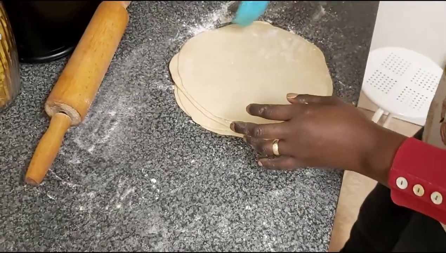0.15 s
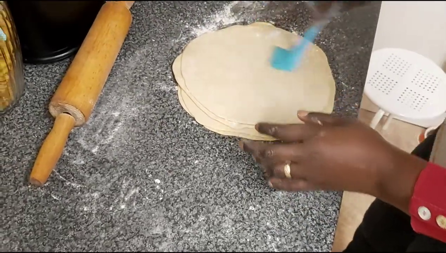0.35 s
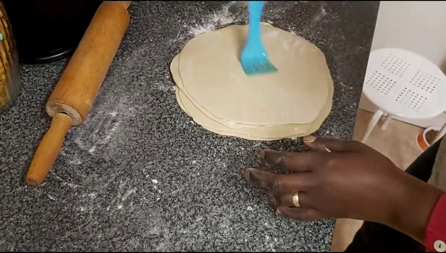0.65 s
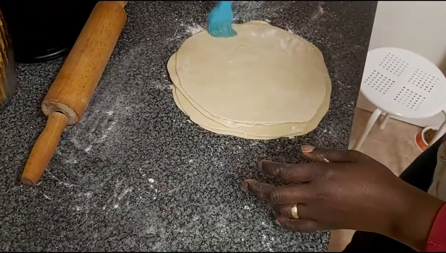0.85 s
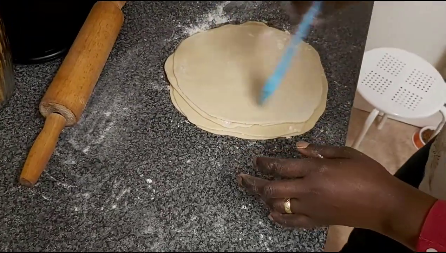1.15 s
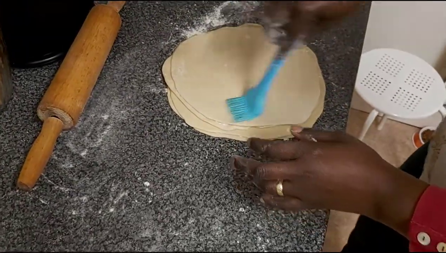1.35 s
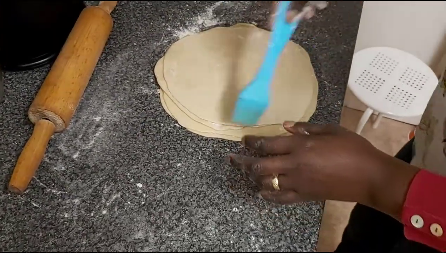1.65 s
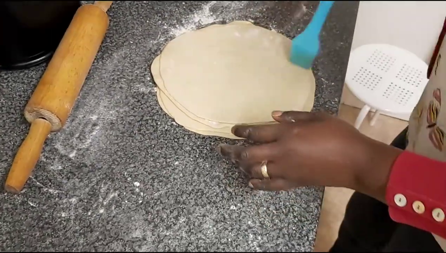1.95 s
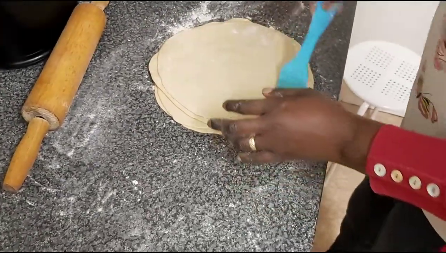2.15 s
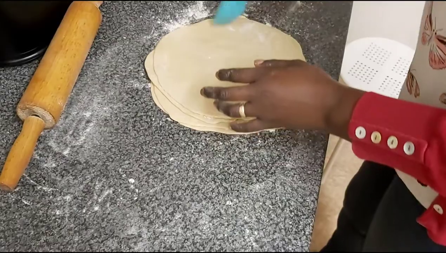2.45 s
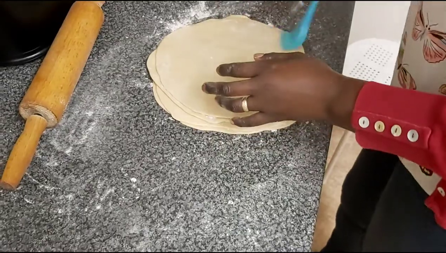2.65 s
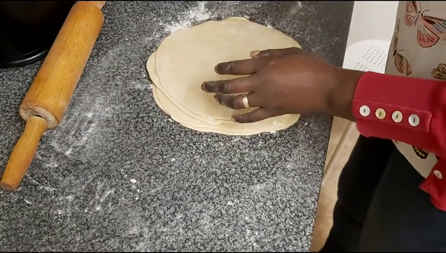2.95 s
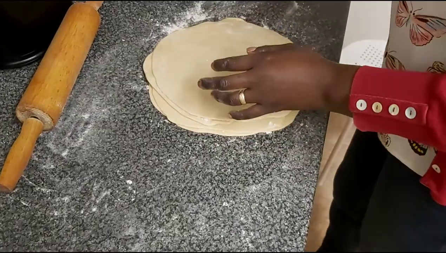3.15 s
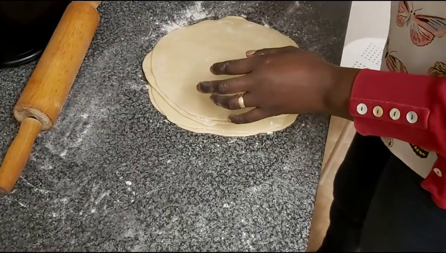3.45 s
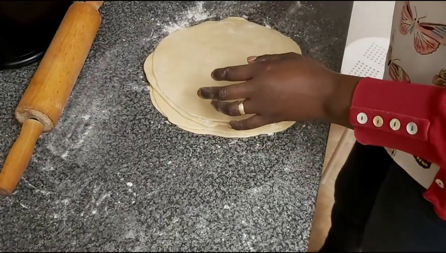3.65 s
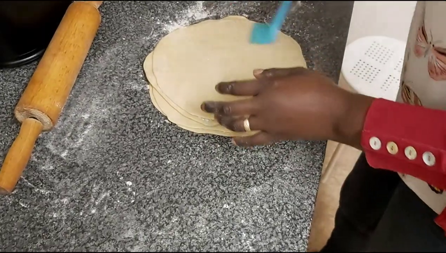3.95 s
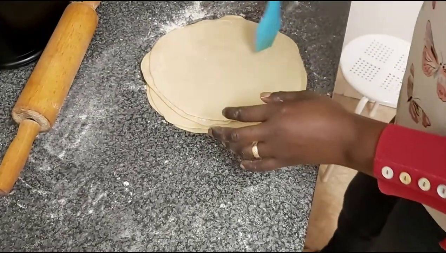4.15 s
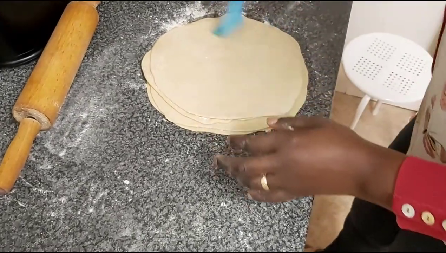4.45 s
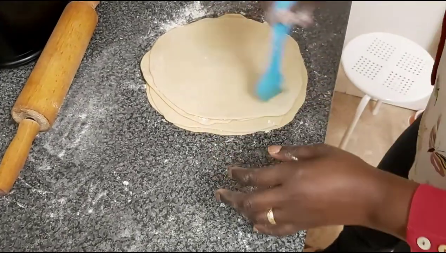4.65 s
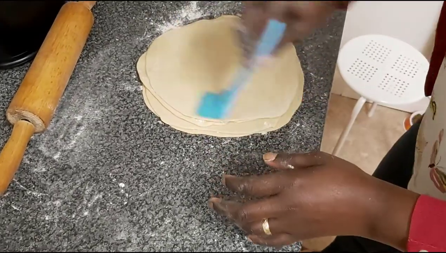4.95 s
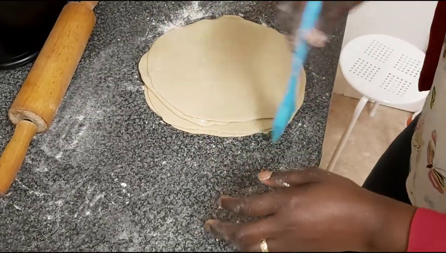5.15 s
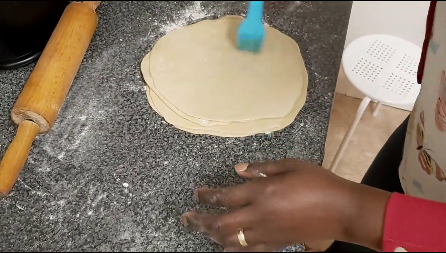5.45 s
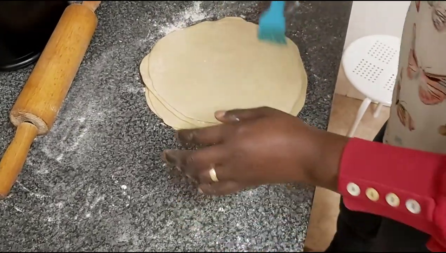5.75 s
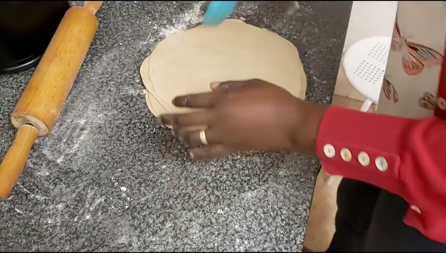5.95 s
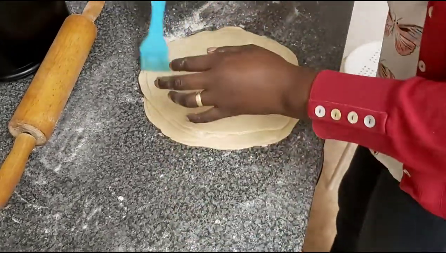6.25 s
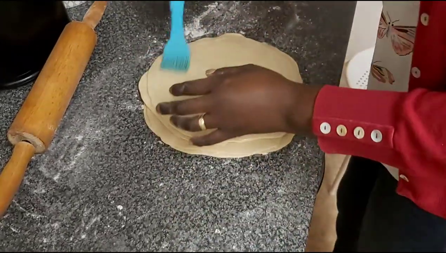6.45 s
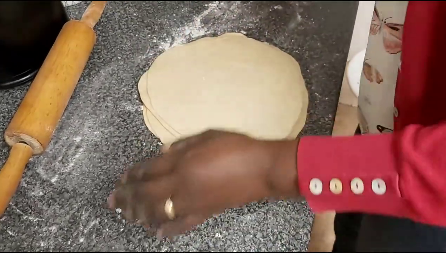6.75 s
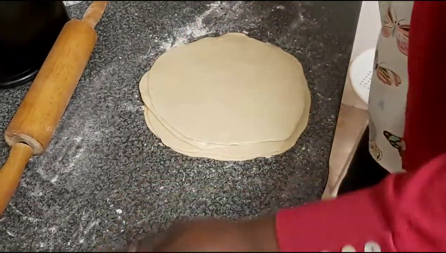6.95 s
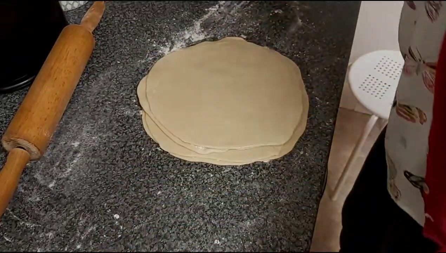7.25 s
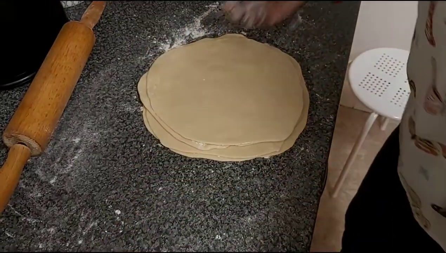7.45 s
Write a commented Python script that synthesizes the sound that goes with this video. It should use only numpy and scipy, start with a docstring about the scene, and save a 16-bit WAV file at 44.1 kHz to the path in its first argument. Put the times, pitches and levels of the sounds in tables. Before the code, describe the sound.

In a small kitchen, a low wavering motor hum runs throughout. Close by, a soft oily brush swishes across dough in quick separate strokes, with small wet ticks. The strokes pause, a tiny squeak and faint sleeve rustle pass, then a pot scuffs and knocks hard on the stone counter. Lighter brushing resumes, and finally a dish lands with a loud clunk, settles and rings briefly.

```python
"""Brushing oil on dough

A soft pastry brush swishes over dough in quick strokes: shaped noise for bristles, oil film and drag.
Midway the brush is dipped and the oil pot scuffs and knocks on the stone counter; near the end a dish
is set down and rings briefly. Both vessels are sums of decaying modes, a noise crack and a room tail.
Wet ticks, a tiny double squeak and cloth rustles join in. Behind them an appliance motor hums: wavering
sine lines over casing rumble and moving air."""
import sys
import numpy as np
from scipy import signal
from scipy.fft import rfft, irfft, next_fast_len
from scipy.io import wavfile

SR = 44100
rng = np.random.default_rng(int(sys.argv[2]) if len(sys.argv) > 2 else 0)


def pcm_store(signal):
    """Save signal as 16-bit PCM."""
    levels = np.round(np.clip(np.atleast_2d(signal), -1, 1) * 32767)
    wavfile.write(sys.argv[1], SR, levels.astype(np.int16).T)


N = 335149

# brush strokes: (touch-down [s], rise [s], fall [s], swish level [dB], wet fizz [dB re swish],
#   dough drag [dB re swish], power share on bristle tips [0-1], touch-down depth under peak [dB], fizz lag [s])
BRUSH_STROKES = [(0.342, 0.098, 0.13, -42.5, -7, -1.5, 0.24, 29, 0.017),
                 (0.685, 0.115, 0.11, -49.5, -6.5, -0.5, 0.46, 12.5, -0.0056),
                 (1.002, 0.051, 0.081, -45.5, -3.7, -5, 0.17, 18, 0.0022),
                 (1.064, 0.061, 0.12, -49.5, -4, -2.5, 0.3, 15, -0.003),
                 (1.447, 0.089, 0.12, -47.2, -4.5, -5.5, 0.62, 21, 0.004),
                 (1.83, 0.11, 0.13, -48.9, -4.3, -3, 0.4, 16.5, 0.0051),
                 (2.218, 0.11, 0.13, -45.5, -3, -5.5, 0.5, 17.0, 0.013),
                 (2.607, 0.069, 0.18, -48.5, -3.5, 1.8, 0.5, 17.0, 0.004),
                 (4.012, 0.096, 0.11, -59.0, -4, 1.5, 0.56, 9, 0.005),
                 (4.314, 0.026, 0.15, -58.5, -2.1, 2.5, 0.2, 18.0, -0.002),
                 (4.553, 0.075, 0.14, -48, -5, -12, 0.52, 10.5, 0.01),
                 (4.969, 0.05, 0.16, -58, -4, -4, 0.4, 11, 0.0016),
                 (5.035, 0.099, 0.1, -48.5, -9, -6.5, 0.78, 13, 0.012),
                 (5.351, 0.099, 0.11, -52.5, -3.0, -4.5, 0.3, 16, 0.01),
                 (5.709, 0.12, 0.15, -50, -3.5, -3.3, 0.45, 19, 0.0033),
                 (6.277, 0.053, 0.117, -62.5, -2.4, -9.8, 0.4, 16.0, -0.00059),
                 (6.523, 0.056, 0.11, -53.5, -1, -8, 0.44, 19, -0.00085)]
# bristle sides, relative spectrum: (frequency [Hz], density [dB per Hz])
SWISH_SPECTRUM = [(1500, -25), (3100, -9.5), (3700, -3), (4250, 0), (4700, -5), (6500, -9.5), (9500, -28),
                  (15000, -40)]
# bristle tips, relative spectrum: (frequency [Hz], density [dB per Hz])
TIP_SPECTRUM = [(2000, -40), (3800, -19), (4700, -2), (5350, 0), (5900, -3), (6600, -7), (7700, -5.5),
                (9500, -26), (15000, -40)]
# tearing oil film, relative spectrum: (frequency [Hz], density [dB per Hz])
FIZZ_SPECTRUM = [(4000, -40), (6500, -10), (8000, -1.5), (9300, -.5), (11100, 0), (12800, -3),
                 (14000, -5.5), (16000, -7.5)]
# drag on the dough, relative spectrum: (frequency [Hz], density [dB per Hz])
DRAG_SPECTRUM = [(300, -11), (700, -4), (1100, 2.5), (1500, 2), (2200, 1.5), (3000, -4.5), (4000, -14),
                 (7000, -40)]
# oily bristles touching down or letting go: (time [s], level [dB], centre frequency [Hz])
BRISTLE_TAPS = [(.636, -48, 8900), (1.016, -43, 3830), (1.047, -43, 7000), (1.236, -54, 7000),
                (2.233, -52, 5500), (4.337, -63, 9000), (5.436, -43.5, 7500), (5.548, -55, 5000)]

# two pushes of the pot along the counter: (start [s], rise [s], fall [s], level [dB])
POT_SCUFFS = [(3.486, 0.042, 0.13, -40), (3.545, 0.033, 0.093, -36.5)]
# pot on stone, relative scuff spectrum: (frequency [Hz], density [dB per Hz])
SCUFF_SPECTRUM = [(25, -10), (90, 3), (300, 2), (550, 9), (850, 14), (1500, 3), (3000, 2.5), (6000, 0.5),
                  (12000, -4.5), (16000, -7)]
# blows of the oil pot: (time [s], level [dB], contact cut-off [Hz])
POT_HITS = [(3.488, -22.5, 1190), (3.521, -7, 1360), (3.533, -6, 1090), (3.548, -8, 1490),
            (3.5815, 1, 6500), (3.585, -6.5, 9000), (3.612, -10.5, 6000), (3.645, -16, 5000)]
# pot ringing: (frequency [Hz], relative level [dB], T60 [s])
POT_RINGING = [(182, -2.5, 0.44), (316, -4.5, 0.27), (486, -13, 0.11), (766, 5.5, 0.074), (903, -4, .1),
               (1537, 4, 0.077), (2506, -9, 0.24), (3150, -10.5, 0.12), (3820, -23, 0.41), (3840, -9, 0.12),
               (4570, -33, 0.27), (5420, -24, .17)]
# pot crack and room tail, relative spectrum: (frequency [Hz], density [dB per Hz])
POT_SPECTRUM = [(41, -37), (70, -17.5), (154, -2), (230, -8.5), (330, -9), (591, -18), (886, -10),
                (1330, -23.5), (1550, -15.5), (1740, -22), (2490, -17.5), (3410, -25), (4770, -26),
                (7480, -43), (15000, -44)]

# blows of the dish: (time [s], level [dB], contact cut-off [Hz])
DISH_HITS = [(7.2703, -1, 17000), (7.283, -4, 3000), (7.311, -13.5, 2980), (7.352, -17, 3970)]
# dish ringing: (frequency [Hz], relative level [dB], T60 [s])
DISH_RINGING = [(204.8, -16.5, 0.74), (326, -15, 0.23), (600.5, 0.5, 0.12), (757, -0.5, 0.073),
                (843, -5.5, 0.18), (942, -3.5, 0.098), (990, -2.5, 0.09), (1166, -9, 0.18),
                (1223, -8.5, 0.35), (1580, -32, .2), (1930, -18, 0.12), (2770, -15, 0.067),
                (2988, -22, 0.42), (3160, -38, 0.12), (3940, -36, 0.12), (5290, -40, 0.41),
                (8120, -43.5, 0.21), (13900, -43, 0.13), (14900, -35, .11), (15200, -38, .16)]
# dish crack and room tail, relative spectrum: (frequency [Hz], density [dB per Hz])
DISH_SPECTRUM = [(71, -42), (120, -20), (150, -26), (191, -15), (330, -10), (484, -10.5), (616, -4),
                 (785, -5), (942, 0.5), (2430, -23), (3040, -25.5), (3500, -36), (5350, -39), (7550, -63.5),
                 (15000, -46)]
# rim singing on landing and on sliding into place: (start [s], rise [s], fall [s], level [dB])
RIM_SWELLS = [(7.268, 0.021, .065, -30.5), (7.331, 0.054, .02, -33.5)]

# small double squeak: (time [s], frequency [Hz], level [dB], half length [s])
SQUEAK_SLIPS = [(2.866, 1520, -36.5, 0.0018), (2.874, 1480, -39, 0.0014)]
# sleeve and apron as the arm moves: (start [s], rise [s], fall [s], level [dB])
CLOTH_RUSTLES = [(3.02, .08, 0.39, -63), (3.22, 0.11, .25, -64.5), (5.93, .06, .5, -71),
                 (6.85, 0.21, .4, -60.5), (7.25, 0.17, 0.61, -54)]
# cloth, relative spectrum: (frequency [Hz], density [dB per Hz])
CLOTH_SPECTRUM = [(1000, -5), (2500, 4.5), (4000, 2), (5500, 0), (7000, -6), (11000, -13.5), (16000, -17)]

# motor lines: (frequency [Hz], level [dB], left re right [dB])
MOTOR_LINES = [(50, -55.5, 2), (61.1, -49, -1), (70.9, -49.5, -0.5), (99.75, -37, 4), (117.1, -53, 0),
               (131.8, -53.5, -7), (146.4, -57.5, 10), (171.4, -45, -5.5), (213.7, -46, -17),
               (238.3, -55, -14), (269.6, -55, -12), (278.4, -54.5, 0.5), (295.3, -49, -10),
               (313.5, -48.5, -6.5), (325.4, -61, -9), (374, -65.5, -11), (376, -56, -1), (405.3, -48, -5),
               (433, -55.5, -7.5), (576.5, -56, -16), (632, -65, 16), (660, -63.5, -12), (727.6, -57.5, -6),
               (783, -60.5, -24), (853, -53.5, -2.5)]
# casing rumble, relative spectrum: (frequency [Hz], density [dB per Hz])
RUMBLE_SPECTRUM = [(20, -28.5), (36, -13), (48, 0.5), (57, 6.5), (79, -14.5), (110, -0.5), (190, -12),
                   (260, -6.5), (310, -3), (420, -4), (540, -11.5), (740, -9.5), (900, -16), (1100, -35),
                   (2500, -90)]
# moving air with duct resonances, relative spectrum: (frequency [Hz], density [dB per Hz])
AIR_SPECTRUM = [(600, -13), (950, 1.5), (1250, 1.5), (1430, -5.5), (1540, -3.5), (1760, -11.5),
                (1885, -2.5), (2100, -16.5), (2315, -8), (2480, -14.5), (3100, -22.5), (3900, -17),
                (6800, -31), (11500, -24), (15500, -26.5)]

# kitchen reverberation: (frequency [Hz], T60 [s])
KITCHEN_T60 = [(100, 0.4), (300, 0.43), (700, 0.34), (1500, 0.36), (4000, 0.35), (8000, 0.35),
               (15000, 0.29)]
# likeness of the two sides: (frequency [Hz], left-right correlation [-1 to 1])
SIDE_CORRELATION = [(30, 0.8), (70, 1), (160, 1), (350, 0.82), (700, 0), (1400, 0), (3000, 0.088),
                    (6000, 0.031), (15000, 0)]
# balance of rumble and air: (frequency [Hz], left re right [dB])
BACKGROUND_BALANCE = [(40, 4), (110, -4), (170, 7), (290, -9.5), (450, -2.5), (800, -2.5), (2000, -9),
                      (5000, -1.5), (14000, -2)]

# a rub: contact ramp, loss at the end of its fall time, bends of the dB slopes
CONTACT_S, FALL_DB, RISE_BEND, FALL_BEND = 0.012, 21, 1.23, 1.14
DRAG_LAG_S = 0.017  # the dough drags just after the bristles move
FIZZ_FOLLOWS, DRAG_FOLLOWS = 1.13, 0.75  # dB swing per dB of swish
RIM_HZ = 2985
CUTOFF_HZ = 15900


def from_db(db):
    """Decibels to gain."""
    return 10 ** (np.asarray(db) / 20)


def rms_one(x):
    """Scale to unit rms."""
    return x / np.sqrt(np.mean(x ** 2) + 1e-20)


def at_hz(points, hz):
    """Interpolate a table on a log-frequency axis."""
    table_hz, value = np.transpose(points)
    return np.interp(np.log(np.maximum(hz, 1)), np.log(table_hz), value)


def pan(balance_db):
    """Left and right gains for a left-re-right balance."""
    return from_db(np.array([[0.5], [-0.5]]) * balance_db)


def drift(rate_hz):
    """Random line of unit rms through rate_hz knots per second."""
    knots = rng.standard_normal(int(N / SR * rate_hz) + 2)
    return rms_one(np.interp(np.arange(N) / SR * rate_hz, np.arange(len(knots)), knots))


def low_pass(x, hz):
    """Second-order causal low-pass."""
    return signal.sosfilt(signal.butter(2, min(hz, 0.45 * SR), fs=SR, output="sos"), x)


def noise(spectrum, size, grain_db=0, balance=None):
    """Stereo noise of a given spectrum, alike in the bass; grain_db makes it a rain of unequal clicks."""
    padded = next_fast_len(size, real=True)
    hz = np.arange(padded // 2 + 1) * SR / padded
    grain = from_db(grain_db * np.clip(rng.standard_normal(padded), -3, 3))
    mid, side = rfft(rng.standard_normal((2, padded)) * grain)
    alike = np.clip(at_hz(SIDE_CORRELATION, hz), -1, 1)
    both = np.sqrt(1 + alike) * mid + np.sqrt(1 - alike) * side * [[1], [-1]]
    if balance is not None:
        both = both * pan(at_hz(balance, hz))
    shaped = irfft(both * from_db(at_hz(spectrum, hz)), padded)
    return rms_one(shaped[:, :size])


def room_tail(spectrum):
    """Diffuse reverberation of a short sound: each octave dies at the kitchen's own rate."""
    t = np.arange(SR) / SR
    bins_hz = np.arange(SR // 2 + 1)
    source = rfft(noise(spectrum, size=SR))
    centres_hz = np.geomspace(60, 15360, 9)
    tail = 0
    for centre_hz, share in zip(centres_hz, np.eye(len(centres_hz))):
        band = at_hz(np.c_[centres_hz, share], bins_hz)  # triangular, overlapping its neighbours
        octave = irfft(source * band, SR)
        tail = tail + octave * from_db(-60 * t / at_hz(KITCHEN_T60, centre_hz))
    return tail


def add(out, time_s, sound):
    """Mix a sound in at time_s."""
    start = round(time_s * SR)
    out[:, start:start + sound.shape[-1]] += sound[:, :N - start]


def swell(start_s, rise_s, fall_s, edge_db=18, follows=1):
    """Gain of one rub: contact edge_db under the peak, a swell while it speeds up, a fade while it slows."""
    t = np.arange(N) / SR - start_s
    rising = np.clip(1 - t / rise_s, 0, 1)
    falling = np.clip((t - rise_s) / fall_s, 0, 6)
    db = -edge_db * rising ** RISE_BEND - FALL_DB * falling ** FALL_BEND
    contact = np.clip(t / CONTACT_S, 0, 1) ** 2
    return contact * from_db(follows * db)


def swells(rows, edge_db=18):
    """Gain of several rubs, added in power."""
    power = sum((from_db(db) * swell(start_s, rise_s, fall_s, edge_db)) ** 2
                for start_s, rise_s, fall_s, db in rows)
    return np.sqrt(power)


def brush(swish_db=0.3, tip_db=-0.1, fizz_db=-0.1, drag_db=-0.1, grain_db=6, press_db=0.8):
    """Bristles flick over the dough with sides or tips (swish), tear the oil film (fizz) and drag when pressed."""
    sides = tips = fizz = drag = 0  # powers
    for start_s, rise_s, fall_s, db, wet_db, pressed_db, on_tips, edge_db, fizz_lag_s in BRUSH_STROKES:
        share = np.clip(on_tips, 0, 1)
        swish = (from_db(db) * swell(start_s, rise_s, fall_s, edge_db)) ** 2
        sides = sides + (1 - share) * swish
        tips = tips + share * swish
        wet = swell(start_s + fizz_lag_s, rise_s, fall_s, edge_db, FIZZ_FOLLOWS)
        fizz = fizz + (from_db(db + wet_db) * wet) ** 2
        pressed = swell(start_s + DRAG_LAG_S, rise_s, fall_s, edge_db, DRAG_FOLLOWS)
        drag = drag + (from_db(db + pressed_db) * pressed) ** 2

    def layer(power, level_db, spectrum):
        """Grainy noise under a power envelope."""
        return np.sqrt(power) * from_db(level_db) * noise(spectrum, size=N, grain_db=grain_db)

    bristles = layer(sides, swish_db, SWISH_SPECTRUM) + layer(tips, tip_db, TIP_SPECTRUM)
    film = layer(fizz, fizz_db, FIZZ_SPECTRUM)
    dough = layer(drag, drag_db, DRAG_SPECTRUM)
    sound = bristles * pan(balance_db=-1.3) + film * pan(balance_db=2.5) + dough
    return sound * from_db(press_db * drift(rate_hz=49))  # the hand presses unevenly


def taps(snap_t60_s=0.023, tail_db=-11, tail_t60_s=0.42):
    """Small wet ticks of the bristles: short noise bursts, each with a little room."""
    out, t = np.zeros((2, N)), np.arange(SR) / SR
    for time_s, db, hz in BRISTLE_TAPS:
        spectrum = [(hz / 8, -35), (hz / 2, -5), (hz, 0), (hz * 2, -10), (hz * 4, -28)]
        tick = noise(spectrum, size=SR) * from_db(-60 * t / snap_t60_s)
        tail = noise(spectrum, size=SR) * from_db(tail_db - 60 * t / tail_t60_s)
        add(out, time_s, from_db(db) * (tick + tail))
    return out


def knocks(blows, modes, spectrum, ring_db, crack_db, crack_t60_s, room_db, spread_rad):
    """Each blow rings the vessel's modes, cracks through its dense damped ones and wakes the room."""
    out, t = np.zeros((2, N)), np.arange(SR) / SR
    for time_s, db, contact_hz in blows:
        ring = 0
        for k, (hz, mode_db, t60_s) in enumerate(modes):
            # high modes reach the two sides out of step
            skew = spread_rad * min(hz / 1000, 2) * rng.uniform(-0.64, 1, (2, 1))
            build_up = 1 - np.exp(-t * hz)  # about a cycle, so the lows come late
            decay = from_db(mode_db - 60 * t / t60_s)
            ring = ring + (-1) ** k * np.sin(2 * np.pi * hz * t + skew) * build_up * decay
        crack = noise(spectrum, size=SR) * from_db(-60 * t / crack_t60_s)
        room = room_tail(spectrum) * (1 - np.exp(-t / 0.0034))
        sound = from_db(ring_db) * ring + from_db(crack_db) * crack + from_db(room_db) * room
        onset = np.minimum(t / 0.0002, 1)
        add(out, time_s, from_db(db) * low_pass(sound * onset, contact_hz))
    return out


def oil_pot():
    """The pot scuffs along the stone (grainy noise), bumps and comes down (modal knocks)."""
    hits = knocks(POT_HITS, POT_RINGING, POT_SPECTRUM, ring_db=-21.5, crack_db=-12,
                  crack_t60_s=0.056, room_db=-20.5, spread_rad=0.69)
    grit = noise(SCUFF_SPECTRUM, size=N, grain_db=6)
    return (hits + swells(POT_SCUFFS) * grit) * pan(balance_db=-1.5)


def dish(waver_hz=14):
    """The dish lands and settles (modal knocks); its rim sings for a moment as a wavering sine."""
    hits = knocks(DISH_HITS, DISH_RINGING, DISH_SPECTRUM, ring_db=-12, crack_db=-12,
                  crack_t60_s=0.088, room_db=-15, spread_rad=0.57)
    phase = 2 * np.pi * np.cumsum(RIM_HZ + waver_hz * drift(rate_hz=69)) / SR
    song = np.sqrt(2) * np.sin(phase + [[0], [0.6]])
    return (hits + swells(RIM_SWELLS, edge_db=7) * song) * pan(balance_db=-3.5)


def squeak(room_db=-16):
    """A tiny slip squeaks for a few cycles and hangs in the room."""
    out, t = np.zeros((2, N)), np.arange(N) / SR
    for time_s, hz, db, half_length_s in SQUEAK_SLIPS:
        spectrum = [(hz * 0.55, -25), (hz * 0.73, -1), (hz, 0), (hz * 1.5, -8), (hz * 1.8, -35)]
        add(out, time_s, from_db(db + room_db) * room_tail(spectrum))
        envelope = np.exp(-0.5 * ((t - time_s) / half_length_s) ** 2)
        out += from_db(db) * np.sin(2 * np.pi * hz * (t - time_s)) * envelope
    return out * pan(balance_db=-8)


def cloth():
    """Sleeve and apron rub as the arm moves: grainy noise of uneven level."""
    rub = swells(CLOTH_RUSTLES, edge_db=10) * noise(CLOTH_SPECTRUM, size=N, grain_db=2.5)
    return rub * from_db(1.7 * drift(rate_hz=41)) * pan(balance_db=-4)


def appliance(throb=0.13, wander_rad=0.35, rumble_db=-40, air_db=-53.5):
    """Motor lines waver slightly, the higher the more, over casing rumble and moving air."""
    t, hum = np.arange(N) / SR, 0
    for hz, db, balance_db in MOTOR_LINES:
        phase = 2 * np.pi * hz * t + wander_rad * hz / 200 * drift(rate_hz=3)  # wander_rad holds at 200 Hz
        skew = hz / 2000 * rng.uniform(-1, 1, (2, 1))
        level = np.sqrt(2) * from_db(db) * (1 + throb * drift(rate_hz=5))
        hum = hum + level * np.sin(phase + skew) * rms_one(pan(balance_db))
    rumble = noise(RUMBLE_SPECTRUM, size=N, balance=BACKGROUND_BALANCE)
    air = noise(AIR_SPECTRUM, size=N, balance=BACKGROUND_BALANCE)
    return hum + from_db(rumble_db) * rumble + from_db(air_db) * air


def scene():
    """Everything at the counter over the steady hum."""
    return brush() + taps() + oil_pot() + dish() + squeak() + cloth() + appliance()


def record(dry):
    """Cut the top steeply with an elliptic low-pass."""
    return signal.sosfilt(signal.ellip(12, 0.1, 90, CUTOFF_HZ, fs=SR, output="sos"), dry)


dry = scene()
out = record(dry)
pcm_store(out)
```